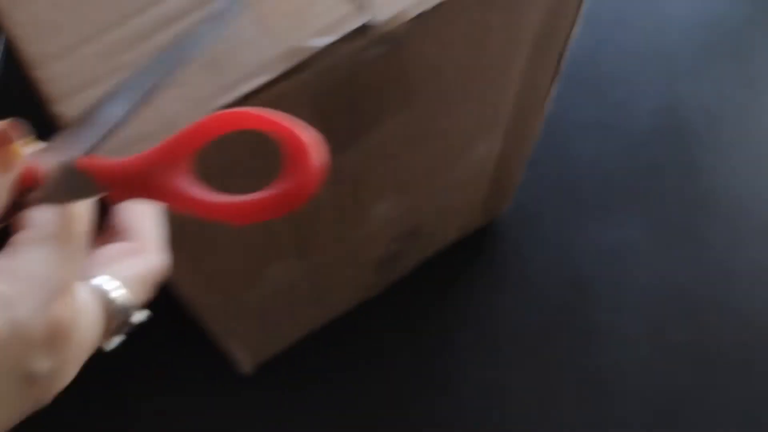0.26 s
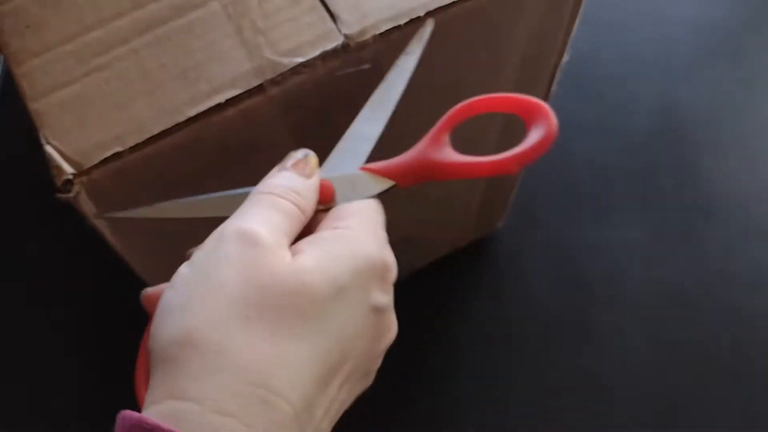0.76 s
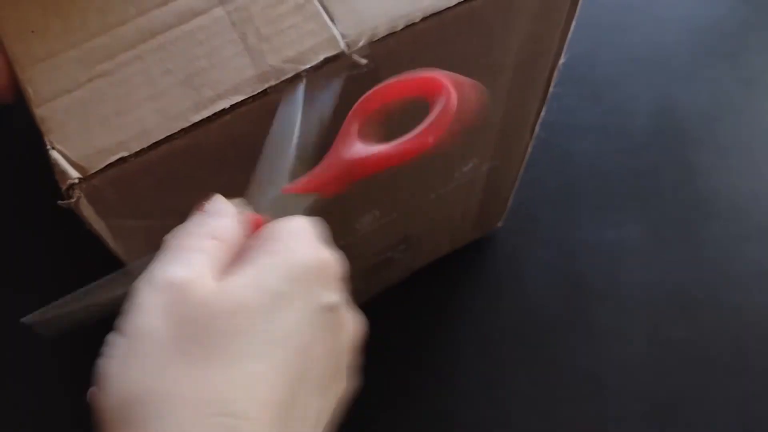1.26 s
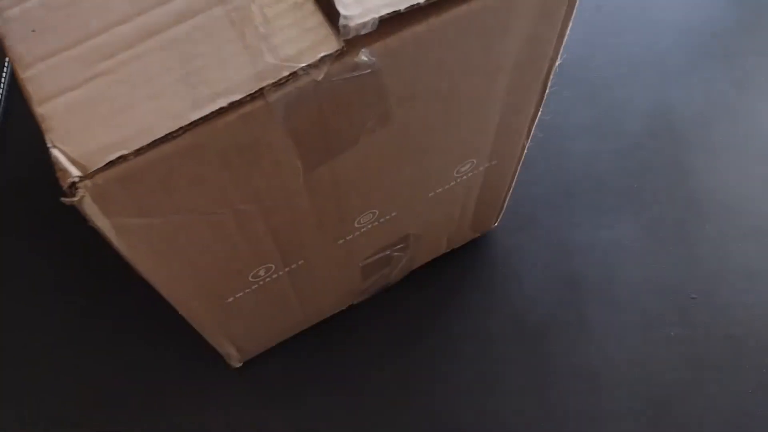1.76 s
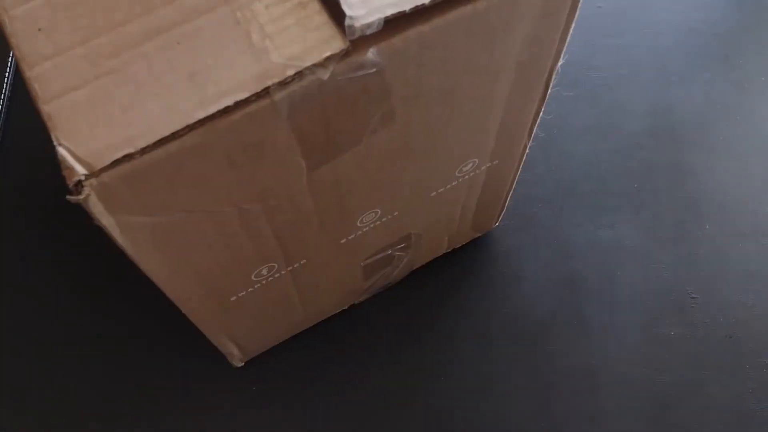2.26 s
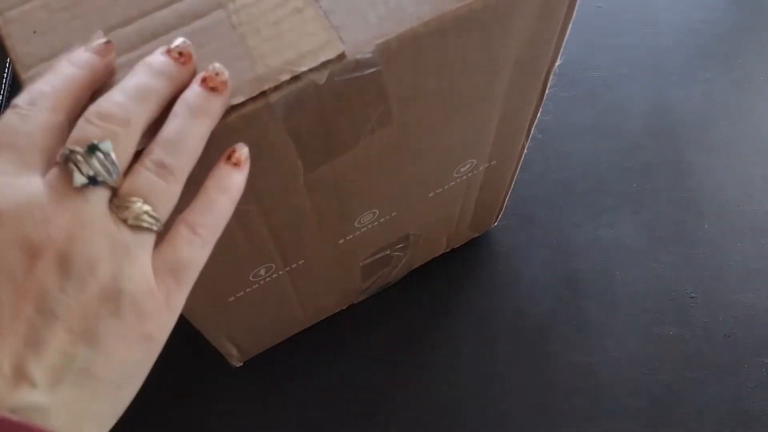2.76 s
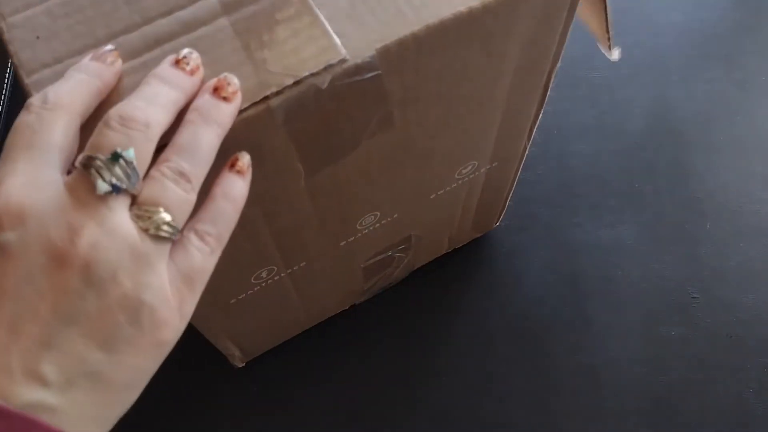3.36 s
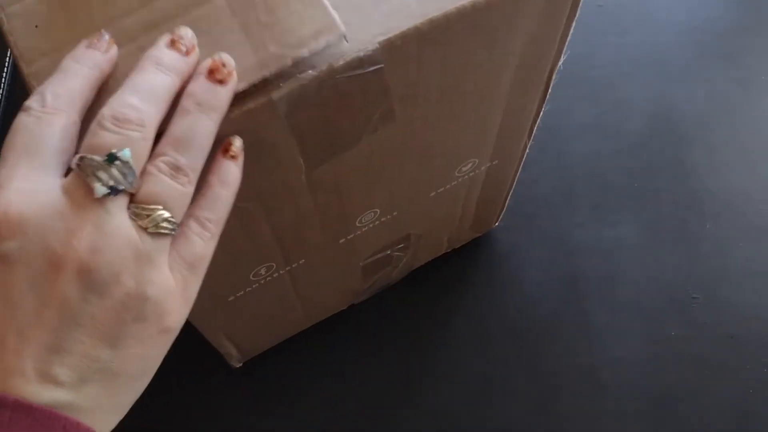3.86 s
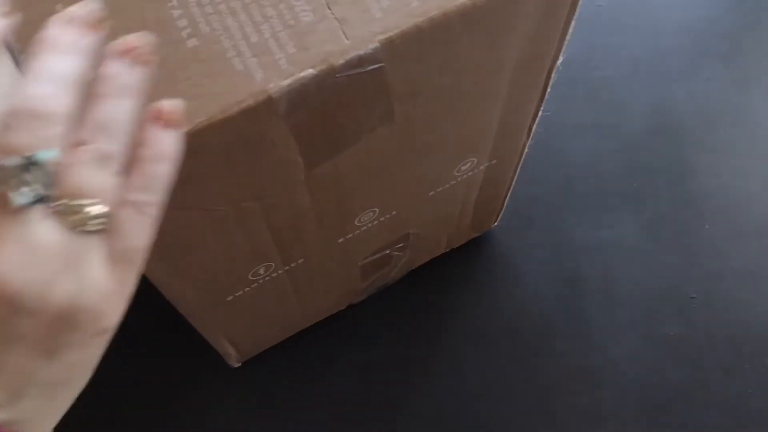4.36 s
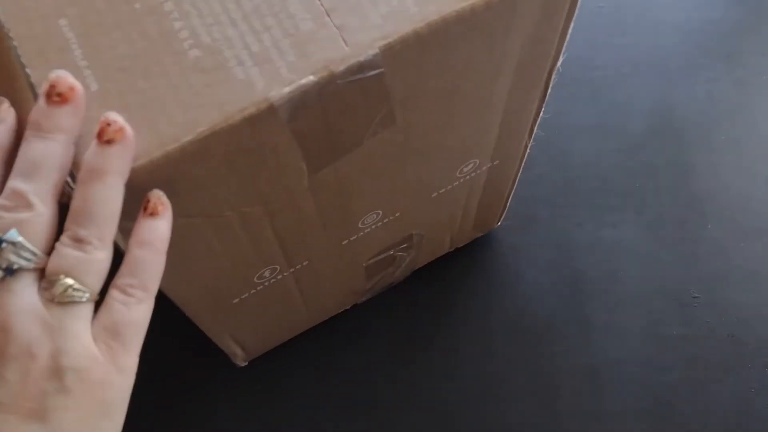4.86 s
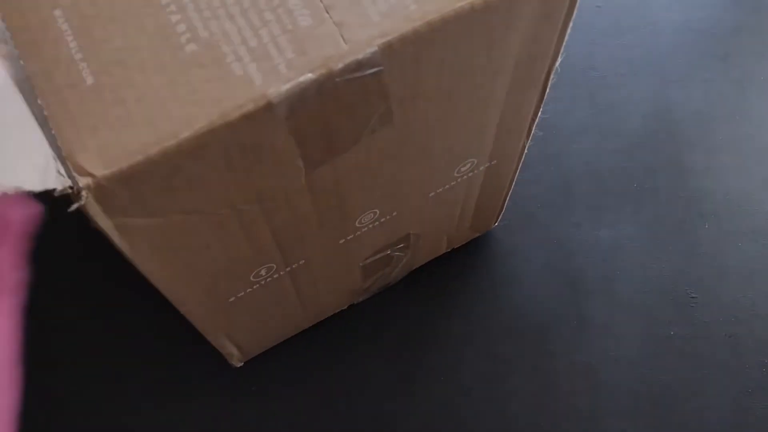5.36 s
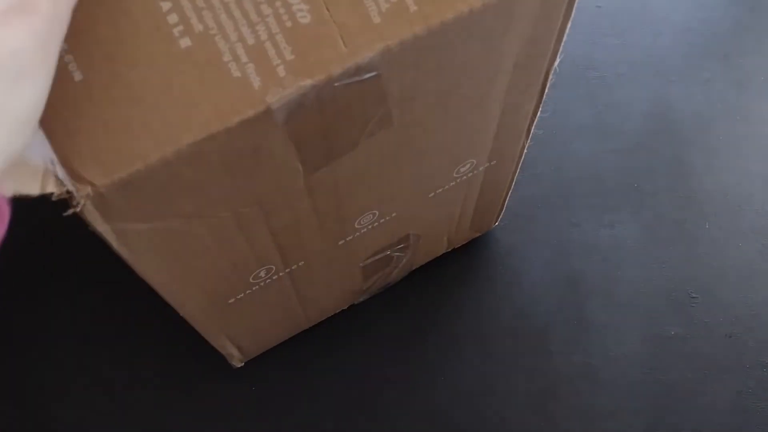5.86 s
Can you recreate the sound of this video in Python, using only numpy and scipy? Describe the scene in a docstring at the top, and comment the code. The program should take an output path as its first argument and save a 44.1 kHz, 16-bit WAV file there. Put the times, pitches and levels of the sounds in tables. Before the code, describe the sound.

Tape snaps and rips loudly on a hollow carton, followed by quiet card rustles, a heavy box knock and light fumbling in a small room.

```python
"""Cardboard box slit open, close up

A phone's two spaced microphones sit close to hands on a cardboard box while scissors slit its packing tape.
Knocks ring the modes and panels of the hollow box; rubbing and tearing are grains of noise that also drive it.
Tape and blade tick as short snaps, some with a brief ring of the blade; a dragging finger squeaks faintly.
A small furnished room answers with a noise tail, over the faint hiss of the microphones.
"""
import sys
import numpy as np
from scipy import signal
from scipy.fft import rfft, irfft
from scipy.io import wavfile

SR = 44100
rng = np.random.default_rng(int(sys.argv[2]) if len(sys.argv) > 2 else 0)


def store_wav(level_fs):
    """Save 16-bit WAV to argv[1]."""
    pcm = np.round(np.clip(np.atleast_2d(level_fs), -1, 1) * 32767)
    wavfile.write(sys.argv[1], SR, pcm.T.astype(np.int16))


N = 269451

# Hiss of the microphones. Each row: frequency in Hz, relative density in dB per Hz.
HISS_COLOUR = [(15, -12), (25, -9.5), (87, 2.5), (273, -2.5), (445, -7), (568, -8.5), (634, -7.5),
               (878, -10.5), (5420, -20.5), (15200, -21.5), (16500, -77.5)]
# Response of the microphones. Each row: frequency in Hz, gain in dB.
MIC_RESPONSE = [(25, -22.5), (50, -12.5), (80, -5.5), (120, -2), (11000, -1.5), (13500, 1.5), (16000, 0.5)]
# Where on the box the hands work. Each row: time in seconds, left minus right level in dB.
HANDS = [(0, 0), (.45, 0), (.6, 0), (1.3, 1.5), (3, 2), (3.9, 0), (4.03, 2), (4.4, 1), (4.8, 3.5),
         (6.11, 2)]
# Modes of the hollow box. Each row: frequency in Hz, relative level in dB, decay to -60 dB in seconds.
BOX_MODES = [(87, -24.5, 0.37), (112.2, -15, 0.068), (163.5, -0.5, 0.062), (191.6, -4.5, 0.072),
             (266.3, -3.5, .12), (341, -2, 0.097), (403.5, 3, 0.11), (431.3, 4, 0.058), (511, 0, 0.078),
             (590, 2, 0.073), (696, -7, 0.092), (870, -11.5, 0.049), (894, -11.5, 0.014),
             (1058, -13, 0.047), (1170, -5, 0.066), (1319, -6, 0.06), (1546, -13.5, 0.023),
             (1910, -7.5, 0.039), (2270, -6, 0.035), (2554, -6.5, 0.037), (2665, -12, 0.035)]
# Where the parts of a blow lie: thud, drum from, drum to, wall, flap. Each entry: frequency in Hz.
PARTS_HZ = [140, 260, 600, 1200, 2400]
# Card panels, too dense in modes to ring singly. Each row: frequency in Hz, relative density in dB per Hz.
CARD_COLOUR = [(500, -11.5), (800, -3.5), (1150, -3), (1600, -3.5), (2500, -2), (3000, -5.5), (3400, -9.5),
               (5000, -21.5), (9000, -30.5)]
# Faint squeaks of a dragging finger.
# Each row: start in seconds, length in seconds, start pitch in Hz, end pitch in Hz, relative level in dB.
SQUEAKS = [(3.5, 0.063, 1500, 1500, -69), (5.602, .29, 2150, 1860, -64.5), (3.585, 0.11, 1700, 1100, -71)]
# Hands sliding over the card.
# Each row: time in seconds, dull hiss in dB, bright hiss in dB, box drive in dB (relative levels).
RUB = [(0, -57, -59, -61), (.262, -53, -44.5, -63), (.43, -57.5, -63, -61.5), (.53, -75, -77, -78),
       (.95, -82, -89, -82.5), (1.19, -64.5, -64.5, -63.5), (1.3, -80, -87, -78.5),
       (1.49, -53.5, -53.5, -48), (1.605, -58, -53.5, -58), (1.699, -71, -87, -76.5),
       (2.1, -94, -102.5, -97), (3.1, -78.5, -67.5, -68.5), (3.28, -84, -70, -73),
       (3.382, -66, -64.5, -62.5), (3.75, -80.5, -82, -84), (4.1, -68.5, -59.5, -55.5),
       (4.3, -66, -66, -76), (4.499, -74, -71, -68.5), (4.7, -66.5, -69.5, -70), (5.2, -76.5, -82.5, -73.5),
       (5.45, -70, -64.5, -69.5), (5.7, -73, -82.5, -75.5), (5.864, -68.5, -66, -71),
       (6.11, -84.5, -84, -82)]
# Skin on card, dull part. Each row: frequency in Hz, relative density in dB per Hz.
DULL_COLOUR = [(2000, -20), (3200, 0), (6000, 0), (8000, -10), (12000, -25)]
# Skin on card, bright part. Each row: frequency in Hz, relative density in dB per Hz.
BRIGHT_COLOUR = [(4500, -22), (6500, 1.5), (9000, 8), (12000, 5), (16000, 0)]
# Short rips and scrapes. Each row: start in seconds, relative hiss level in dB, drum drive in dB above the hiss,
# wall drive in dB above the hiss, hold in seconds, fade to -60 dB in seconds.
RIPS = [(0.068, -47.5, -35, -8.5, .011, 0.48), (0.501, -61.5, 9, 9, 0.047, 0.18),
        (1.004, -56.5, 2, 3.5, 0.024, 0.09), (1.315, -28, 1, -22, 0.013, 0.15),
        (1.35, -24, -11, -11.5, 0.034, 0.19), (1.524, -40.5, -7.5, -6, 0.061, 0.057),
        (2.219, -61, -15, -1, 0.033, 0.16), (2.318, -52, -2.5, -5, 0.006, 0.28),
        (2.962, -64.5, -1, -17, .032, 0.14), (3.184, -64.5, 16.5, 11.5, 0.049, 0.068),
        (3.225, -60.5, -4, 3, 0.051, .043), (3.345, -66, 3, -2, 0.041, 0.072),
        (3.42, -57, -14, -7, .02, 0.63), (3.567, -58.5, -15, 5.5, 0.0087, 0.079),
        (3.844, -59, -2, 0, 0.022, .16), (3.956, -52.5, 7.5, -1.5, 0.036, 0.088),
        (4.036, -40, 16, 14.5, 0.0056, 0.26), (4.142, -54, -7, -0.5, 0.072, 0.25),
        (4.45, -58.5, -9, 1.5, 0.066, 0.075), (4.651, -58, -16, -3.5, 0.049, 0.11),
        (4.763, -67, 8, -6, 0.024, 0.29), (4.92, -72.5, 12, 8.5, 0.045, 0.17),
        (4.99, -69.5, 7.5, 19.5, 0.05, 0.15), (5.29, -61, -8.5, -11, 0.09, 0.09),
        (5.392, -55.5, 1.5, -3.5, 0.038, .11), (5.53, -61.5, -16, -8, .017, 0.1),
        (5.587, -59, -10, -1, 0.0059, 0.11), (5.634, -81, 14, -11, 0.016, .069),
        (5.709, -62, 5, -6, 0.024, .08), (5.893, -68, 3, -10, 0.012, 0.077)]
# Tearing tape. Each row: frequency in Hz, relative density in dB per Hz.
TAPE_COLOUR = [(410, -2), (700, -8.5), (1010, -30), (1240, -12.5), (1960, -16), (4950, -10), (11500, -17.5),
               (13500, -15.5), (15900, -24), (16500, -33)]
# Ticks of tape and blade. Each row: start in seconds, relative level in dB, centre in Hz.
TICKS = [(0.078, -33.5, 6100), (0.1243, -38.5, 6560), (0.154, -37.5, 7280), (0.2542, -34, 9800),
         (0.378, -46, 5200), (0.391, -39, 5290), (0.4086, -43, 3660), (1.093, -42.5, 4945),
         (1.108, -47, 4900), (1.1165, -42, 4850), (1.126, -39.5, 4780), (1.1377, -41, 5760),
         (1.151, -43, 6150), (1.1586, -47, 4090), (1.198, -49.5, 5270), (1.206, -58, 4750),
         (1.228, -50.5, 6200), (1.3291, -21.5, 5000), (1.418, -29, 5470), (1.5474, -41, 6560),
         (1.5678, -38, 3870), (2.2291, -47, 4250), (2.2736, -54, 4040), (2.7323, -49, 8800),
         (2.828, -52, 7800), (2.921, -58, 10000), (3.063, -50.5, 12200), (3.158, -61, 11000),
         (3.373, -40.5, 8000), (3.4196, -37.5, 7900), (3.729, -50.5, 6400), (3.9984, -36, 3250),
         (4.1984, -32, 8900), (4.7757, -54, 3570), (5.6074, -44.5, 3400)]
# Modes of the blade. Each row: nominal frequency in Hz, relative level in dB, nominal decay to -60 dB in seconds.
BLADE_MODES = [(4960, -2, .035), (3880, -12, .025), (6890, -12, .02)]
# Knocks on the box. Each row: start in seconds, relative drum level in dB, then thud, wall and crack
# in dB above the drum, and the pitch of the struck panel in Hz.
KNOCKS = [(0.243, -44, -16, -6.5, -3, 1610), (0.522, -29.5, 4, 8.5, -13.5, 1362),
          (0.536, -39.5, -20, -1, -3.5, 1230), (0.868, -47.5, 7.5, -8, -24, 1030),
          (0.974, -37.5, -20, -10.5, -21.5, 1360), (1.092, -52, 1, 10, -1, 1410),
          (1.137, -49.5, 15, 6, 5, 1253), (1.325, -18.5, 2.5, -2.5, -13, 1230),
          (1.33, -18.5, 12.5, -18, -3.5, 1334), (2.013, -45, 2.5, -10, -28, 1310),
          (2.173, -61, -1, 15, 9, 903), (2.216, -54.5, 18, 10.5, 5.5, 910),
          (2.321, -51, 10, 17.5, 12.5, 1060), (2.341, -52.5, 15.5, 6.5, -19.5, 1150),
          (2.62, -65, 5.5, 2, 15, 1115), (2.842, -50, 15, -11.5, 3.5, 1370),
          (2.993, -48.5, -9, -2, -9, 1280), (3.135, -44, -10, -21, -30, 877),
          (3.168, -32, 0, 0, -18.5, 1420), (3.236, -30, -9, -5, -22, 1373), (3.348, -56, -5, 2, -13, 930),
          (3.414, -47, -20.5, 6, 7.5, 826), (3.572, -54, -26, 13, -10, 1200),
          (3.858, -52, 11, -1, -0.5, 1370), (3.973, -32.5, -10, 5, -3.5, 850),
          (4.028, -8, 6.5, 2, -12.5, 800), (4.148, -31.5, -25, 7, -3, 1425), (4.362, -53, 1, 4.5, 4.5, 925),
          (4.453, -50.5, -5, 0, -5, 1060), (4.483, -36.5, 4.5, -0.5, -22.5, 950),
          (4.671, -43, 5, 5, -16, 924), (4.808, -38.5, 0.5, -14, -17.5, 870),
          (4.948, -50, -25, 9, -6, 1170), (5.03, -37, -26, 8.5, -49, 1060),
          (5.069, -40.5, -27, 7, -26, 890), (5.116, -55, -29, -2, -7, 1170),
          (5.204, -43.5, 21.5, -6.5, -8.5, 840), (5.296, -53.5, 22, -1, -3, 870),
          (5.325, -53, 16, -10, -14, 875), (5.402, -50, -9, -14, 0, 1230), (5.43, -57, 23, -5, 0, 1314),
          (5.704, -49.5, 16.5, -25, -0.5, 1314)]
# The softer the contact, the weaker its crack. Each row: crack in dB above the drum, push in milliseconds.
CONTACT = [(-34, 7.6), (-21.5, 2.2), (0.5, 1.2)]
# The heavier the thud, the deeper the ring. Each row: thud in dB above the drum, ring in Hz, its lift in dB.
DEEPEST = [(-0.5, 345, 7), (6, 299, 8.5), (10.5, 187, 7.5), (16, 112, 15.5)]

HISS_DB, TOP_HZ = -71, 16000  # rms of the hiss before the phone's cut; edge of that cut
LEFT_LAG_MS = 0.21
ROOM_T60_S, ROOM_TREBLE_T60_S, ROOM_DB = 0.36, 0.24, -16.5
LARGEST = 4  # no grain beyond this many scatters above the smallest
RISE_PER_HOLD = 0.27  # rise of a rip as a share of its hold
RUB_THUD_DB, RUB_WALL_DB = -8.5, 2  # above the box drive of the slide
BLADE_DB, BLADE_REACH = 3, 0.052  # above the tick's table level; how near in pitch, as a share of the blade's
CRUNCH_DB, FLAP_DB = -6, -3  # above the drum; above the mean of wall and crack
PANEL_DB, PANEL_WIDTH, PANEL_T60_S = -9.5, 0.076, 0.14  # above the wall; half-width as a share of its pitch


def undb(db):
    """dB to gain."""
    return 10 ** (np.asarray(db) / 20)


def unit(x):
    """Scale to rms 1."""
    return x / np.sqrt(np.mean(x ** 2))


def colour(x, points):
    """Shape by (Hz, dB) points joined on a log frequency axis."""
    hz, db = np.transpose(points)
    f = np.maximum(np.fft.rfftfreq(x.shape[-1], 1 / SR), 1)
    gain = undb(np.interp(np.log(f), np.log(hz), db))
    return irfft(rfft(x) * gain, x.shape[-1])


def band(x, lo_hz, hi_hz):
    """Butterworth band-pass, its upper edge kept below the Nyquist frequency."""
    sos = signal.butter(2, [lo_hz, min(hi_hz, .45 * SR)], "band", fs=SR, output="sos")
    return signal.sosfilt(sos, x)


def ring(modes, gains, seconds):
    """Sum of decaying sine modes after one blow."""
    t = np.arange(int(seconds * SR)) / SR
    hz, db, t60 = np.transpose(modes)[:, :, None]
    decay = np.exp(-np.log(1000) * t / t60)
    return gains @ (undb(db) * np.sin(2 * np.pi * hz * t) * decay)


def side(s):
    """Left minus right dB of a sound made at time s, from where the hands are."""
    return np.interp(s, *np.transpose(HANDS))


def add(out, s, x, pan_db):
    """Mix a sound in at time s; it reaches the left microphone a little late."""
    x = np.broadcast_to(x, (2, x.shape[-1])) * undb([[pan_db / 2], [-pan_db / 2]])
    for ch, late in enumerate((LEFT_LAG_MS / 1000, 0)):
        i = int((s + late) * SR)
        out[ch, i:i + x.shape[1]] += x[ch, :N - i]


def crackle(scatter_db, grain):
    """Dense noise grains of long-tailed sizes, shared in time but not in shape by both microphones."""
    scatters = np.minimum(rng.exponential(size=N // grain + 1), LARGEST)
    size = np.repeat(undb(scatter_db * scatters), grain)[:N]  # grain is in samples
    return unit(rng.standard_normal((2, N)) * size)


def snap(lo_hz, hi_hz, t60):
    """A few milliseconds of band-limited noise crack, peak 1."""
    t = np.arange(int(0.024 * SR)) / SR
    envelope = np.minimum(t / 0.00053, 1) * np.exp(-np.log(1000) * t / t60)
    x = band(rng.standard_normal((2, len(t))) * envelope, lo_hz, hi_hz)
    return x / np.max(np.abs(x))


def microphone_hiss():
    """Steady coloured noise, independent in the two microphones."""
    return undb(HISS_DB) * unit(colour(rng.standard_normal((2, N)), HISS_COLOUR))


def room(x):
    """Add a decaying noise tail for each microphone; the treble dies sooner."""
    t = np.arange(int(.7 * SR)) / SR
    noise = rng.standard_normal((2, len(t))) * np.clip((t - .002) / 0.012, 0, 1)
    tail = band(noise, 60, 2200) * undb(-60 * t / ROOM_T60_S)
    tail += band(noise, 2900, 27000) * undb(-60 * t / ROOM_TREBLE_T60_S)
    tail = tail / np.sqrt(np.sum(tail ** 2) / 2)
    return x + undb(ROOM_DB) * signal.fftconvolve(x, tail, axes=1)[:, :N]


def squeaks():
    """Narrow, rough stick-slip whistles whose pitch holds or sinks."""
    out = np.zeros((2, N))
    for s, length, start_hz, end_hz, db in SQUEAKS:
        u = np.arange(int(length * SR)) / (length * SR)
        rough = unit(band(rng.standard_normal((2, len(u))), 6, 110))
        pitch_hz = start_hz + (end_hz - start_hz) * u
        whistle = rough * np.sin(2 * np.pi * np.cumsum(pitch_hz) / SR)
        add(out, s, undb(db) * np.sin(np.pi * u) ** .5 * whistle, 3.0)
    return out


def friction():
    """Slides and rips: crackle heard directly as hiss, and driving the box modes and panels."""
    t = np.arange(N) / SR
    s, *columns = np.transpose(RUB)
    pan = np.outer([.5, -.5], side(t))
    dull, bright, drum = (undb(np.interp(t, s, c) + pan) for c in columns)
    thud, wall = drum * undb(RUB_THUD_DB), drum * undb(RUB_WALL_DB)

    rip = np.zeros((2, N))
    u = np.arange(int(.6 * SR)) / SR
    for s, db, drum_up, wall_up, hold, fade in RIPS:
        rise = RISE_PER_HOLD * hold
        shape = np.clip(u / rise, 0, 1) ** 2 * undb(-60 * np.maximum(u - rise - hold, 0) / fade)
        for line, up in ((rip, 0), (drum, drum_up), (thud, drum_up - 9.0), (wall, wall_up)):
            add(line, s, undb(db + up) * shape, side(s))
    out = rip * unit(colour(crackle(3.2, grain=40), [(300, -43.0)] + TAPE_COLOUR))

    box_hz = np.transpose(BOX_MODES)[0]
    part = np.digitize(box_hz, [240, 800])  # thud, drum, wall modes
    # a light touch stirs mostly the air in the box and its rocking on the table
    rubbed = 1 + sum(2.5 * np.exp(-(np.log(box_hz / hz) / .12) ** 2) for hz in (110, 415))
    for k, (drive, share) in enumerate(((thud, 1), (drum, 1), (wall, .6))):
        response = ring(BOX_MODES, rubbed * (part == k), .2)[None]
        response = response / np.sqrt(np.sum(response ** 2))
        force = crackle(1.8, grain=300)
        force = force if k == 2 else force[:1]  # long waves reach both microphones alike
        out += share * signal.fftconvolve(drive * force, response, axes=1)[:, :N]
    out += 0.93 * wall * unit(colour(crackle(3.1, grain=180), CARD_COLOUR))

    grains = crackle(0.7, grain=80)
    out += dull * unit(colour(grains, DULL_COLOUR))
    return out + bright * unit(colour(grains[::-1], BRIGHT_COLOUR))


def ticks():
    """Glue letting go: a snap around its centre; one near the blade's pitch sets it ringing briefly."""
    out = np.zeros((2, N))
    for s, db, hz in TICKS:
        add(out, s, undb(db + 4.0) * snap(hz / 1.6, hz * 1.4, 0.019), side(s))
        # the grip detunes and damps the blade
        held = np.array(BLADE_MODES) * [1 + .035 * rng.standard_normal(), 1, rng.uniform(.4, .9)]
        near = np.exp(-(np.log(hz / BLADE_MODES[0][0]) / BLADE_REACH) ** 2)
        blade = ring(held, rng.standard_normal((2, len(BLADE_MODES))), .05)
        add(out, s, undb(db + BLADE_DB) * near * blade, side(s))
    return out


def knocks():
    """A blow rings the box, most near the panel's pitch; the card crunches and a crack marks the contact."""
    out = np.zeros((2, N))
    log_hz = np.log(np.transpose(BOX_MODES)[0])
    t = np.arange(int(.25 * SR)) / SR
    thud_steps, deep_steps, lift_steps = np.transpose(DEEPEST)
    for s, db, thud, wall, crack, panel_hz in KNOCKS:
        flap, pan = (wall + crack) / 2 + FLAP_DB, side(s)
        deep_hz = np.interp(thud, thud_steps, deep_steps)
        lift = np.interp(thud, thud_steps, lift_steps)
        push_ms = np.interp(crack, *np.transpose(CONTACT))
        push = np.minimum(t / (push_ms / 1000), 1)

        # the spot struck favours some modes, in dB
        place = 4.8 * rng.standard_normal(len(BOX_MODES))
        place += 17.6 * np.exp(-((log_hz - np.log(panel_hz)) / 0.063) ** 2)
        place += lift * np.exp(-((log_hz - np.log(deep_hz)) / .15) ** 2)
        parts = np.interp(log_hz, np.log(PARTS_HZ), [thud - 4.0, 0, 0, wall - 8.0, flap - 3.0])
        gains = undb(db - 11.5 + place + parts)
        # short wavelengths leave the panels differently toward each microphone
        turn = np.where(log_hz > np.log(800), rng.choice([-1, 1], len(BOX_MODES)), 1)
        add(out, s, ring(BOX_MODES, np.array([gains, gains * turn]), .25) * push, pan)

        card = unit(colour(rng.standard_normal((2, len(t))), CARD_COLOUR))
        panels = colour(card, [(panel_hz / 1.3, wall - 8.0), (panel_hz, wall + 1.4),
                               (panel_hz * 1.26, wall - 5.0), (PARTS_HZ[-1], flap)])
        fade = undb(-60 * t / 0.095) + 2.0 * undb(-60 * t / 0.0086)
        add(out, s, undb(db + CRUNCH_DB) * panels * fade * push, pan)

        # the struck panel sings on as a narrow band of noise
        noise = rng.standard_normal((2, len(t)))
        sing = unit(band(noise, panel_hz * (1 - PANEL_WIDTH), panel_hz * (1 + PANEL_WIDTH)))
        add(out, s, undb(db + wall + PANEL_DB - 60 * t / PANEL_T60_S) * sing * push, pan)

        # the crack comes halfway through the push
        add(out, s + push_ms / 2000, undb(db + crack + 3.0) * snap(2500, 11000, 0.042), pan)
    return out


def scene():
    """The box in its room, coloured by the microphones, over their own hiss."""
    hiss = microphone_hiss()
    box = knocks() + ticks() + friction() + squeaks()
    return colour(room(box), MIC_RESPONSE) + hiss


def record(dry):
    """The phone cuts the top steeply with an elliptic low-pass."""
    return signal.sosfilt(signal.ellip(10, .2, 70, TOP_HZ, fs=SR, output="sos"), dry)


dry = scene()
out = record(dry)
store_wav(out)
```